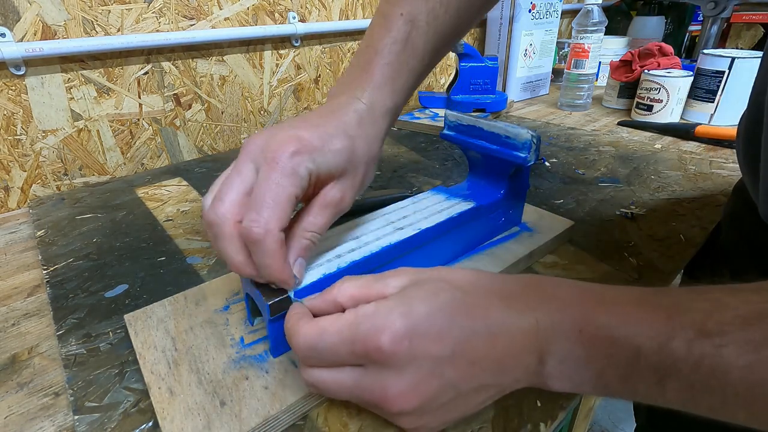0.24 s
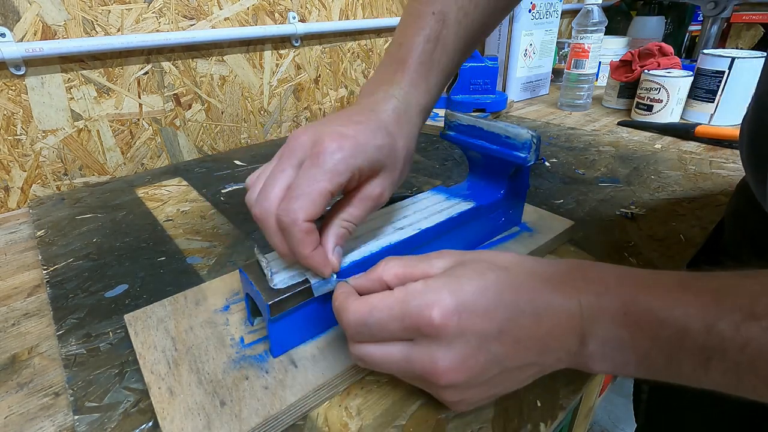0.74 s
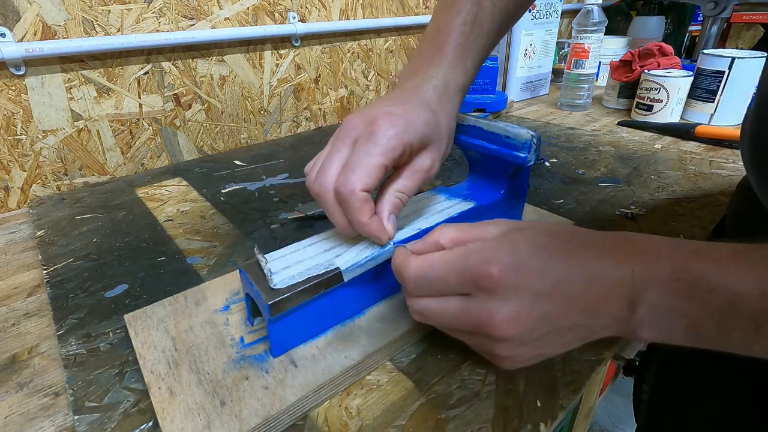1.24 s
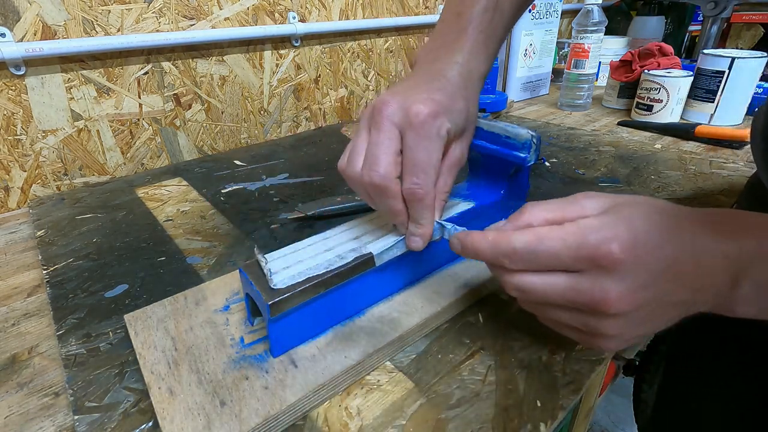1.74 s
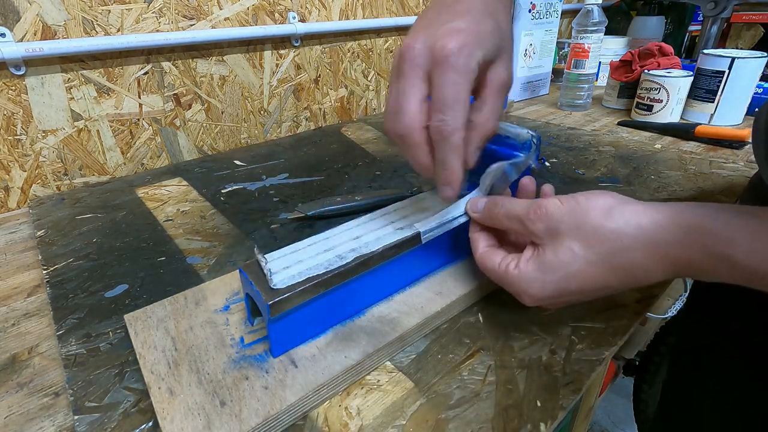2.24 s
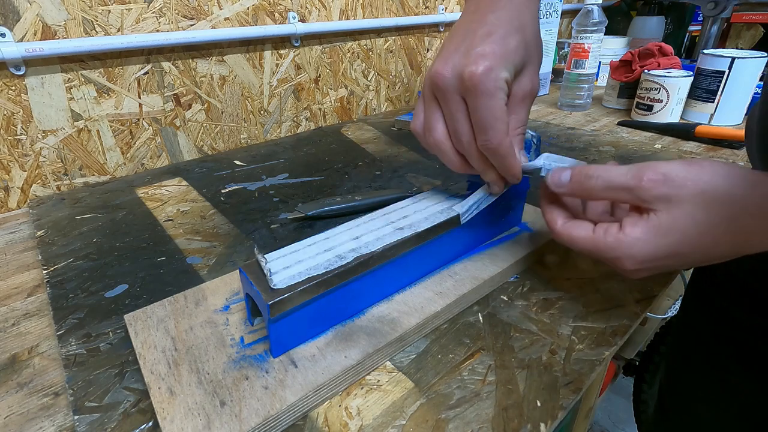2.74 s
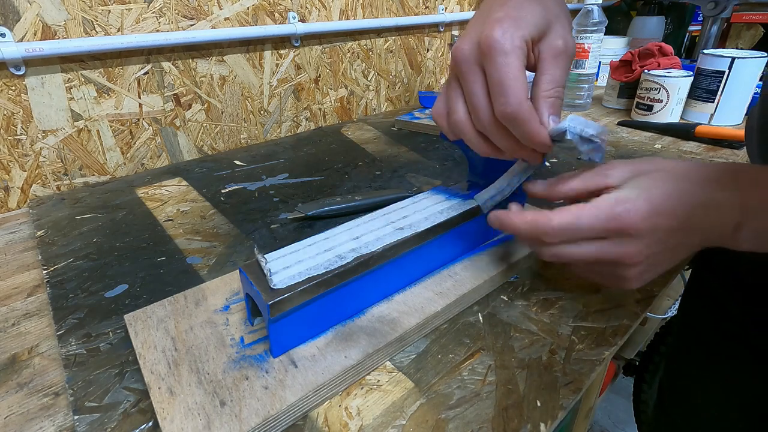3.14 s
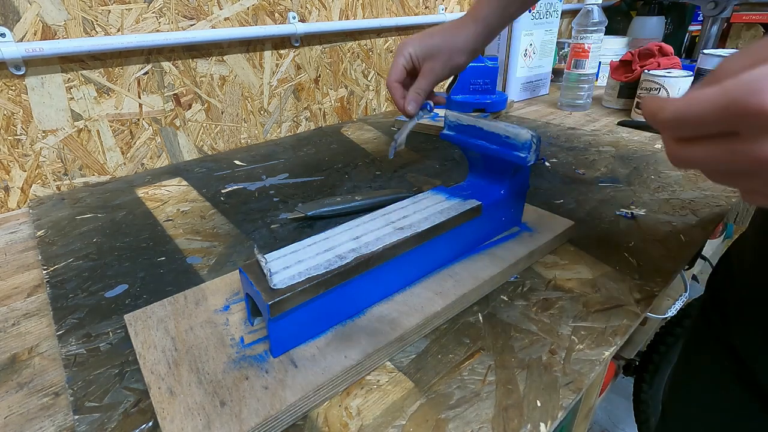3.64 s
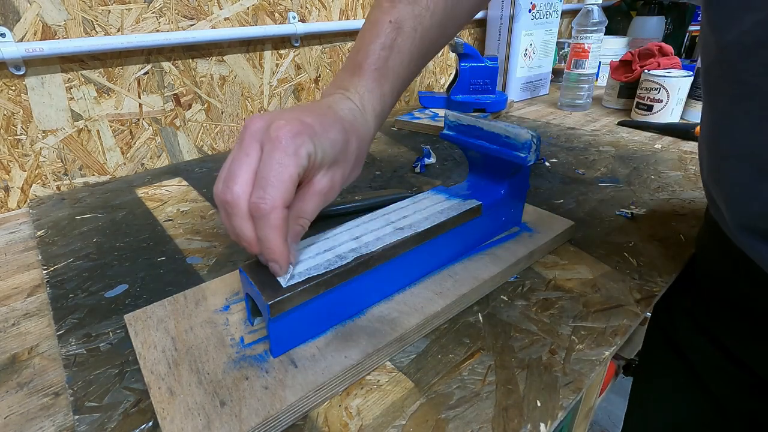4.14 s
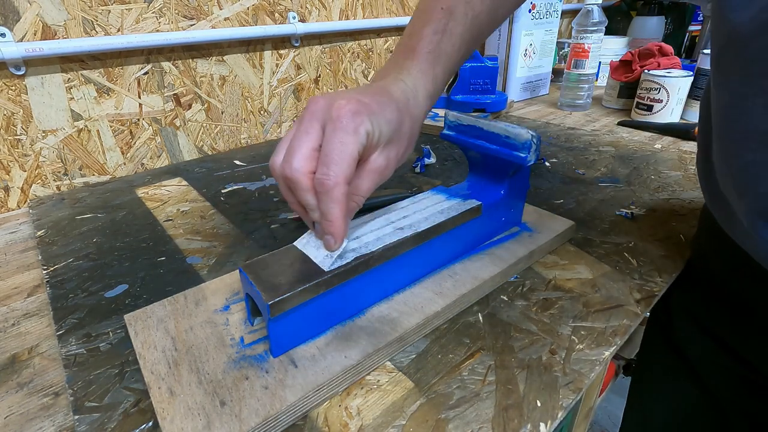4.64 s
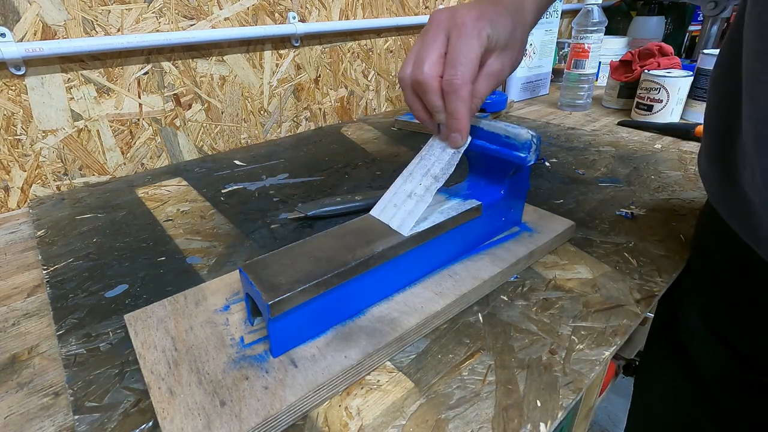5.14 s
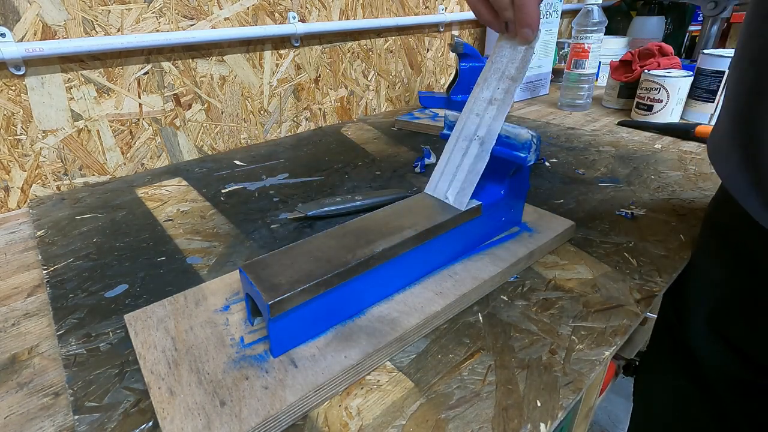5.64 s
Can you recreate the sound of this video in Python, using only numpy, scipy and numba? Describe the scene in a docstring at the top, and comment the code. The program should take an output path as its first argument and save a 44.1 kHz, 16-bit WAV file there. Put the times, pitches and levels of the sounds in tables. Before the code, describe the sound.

A very close, dry stereo scene at a wooden bench in a quiet workshop. From 0 to 0.3 s a dropped knife bounces in a rapid woody rattle with sharp ticks, quickly dying away. Faint tape crackle begins near 0.4 s; from about 1 to 3.3 s narrow masking tape peels in short uneven tugs, bright and papery, with tiny sticky snaps and barely audible low thumps. From 3.4 to 3.75 s the last bits release in a cluster of small clicks and crumpling rustle, thinning out afterwards. At 4.04 s a fingernail makes one light, scratchy tap on the iron. Soft peeling resumes around 4.2 s, with a dull thump at 4.4. The wide strip tears loudest at 5.1 s, then in jerky rips from 5.3 to 5.85 s, with low bench shudders, soft knocks and a breathy, falling tone from the taut strip. Faint room air and a barely audible steady hum continue underneath.

```python
"""A quiet workshop, heard by a close pair of microphones at a wooden bench.
A dropped knife rattles to rest: its blows ring the bench modes. Hands then peel masking tape off a painted
iron part: random slips of glue shape bands of noise into crackle and paper rustle, with sharp single snaps.
The taut strip sings as noise through moving band-passes, the pull shakes the bench, the part thumps softly
and a fingernail taps once. Behind it lies faint banded room air with a steady tone.
"""
import sys
import numpy as np
from scipy import signal
from scipy.io import wavfile
from scipy.ndimage import uniform_filter1d
from numba import njit

SR = 44100
rng = np.random.default_rng(int(sys.argv[2]) if len(sys.argv) > 2 else 0)


def store_wav(level_fs):
    """Save 16-bit WAV to argv[1]."""
    pcm = np.round(np.clip(np.atleast_2d(level_fs), -1, 1) * 32767)
    wavfile.write(sys.argv[1], SR, pcm.T.astype(np.int16))


N = 260190
T = np.arange(N) / SR


def undb(db):
    """Decibels to an amplitude factor."""
    return 10 ** (np.asarray(db) / 20)


def unit(x):
    """Scale to rms 1."""
    return x / np.sqrt(np.mean(x ** 2))


@njit
def moving_bandpass(x, hz, width):
    """State-variable band-pass with a moving centre, gain 1 there."""
    y, b, l = np.empty(len(x)), 0., 0.
    for i in range(len(x)):
        g, k = np.tan(np.pi * hz[i] / SR), width / hz[i]
        v = (b + g * (x[i] - l)) / (1 + g * (g + k))
        b, l, y[i] = 2 * v - b, l + 2 * g * v, k * v
    return y


def band(hz, width):
    """Noise of rms 1 in a steep band."""
    edges = np.clip([hz - width / 2, hz + width / 2], 10, .45 * SR)
    sos = signal.butter(2, edges, "bandpass", fs=SR, output="sos")
    return unit(signal.sosfilt(sos, rng.standard_normal(N)))


def highpass(x, order, hz):
    """Remove what lies below hz."""
    return signal.sosfilt(signal.butter(order, hz, "highpass", fs=SR, output="sos"), x)


def spikes(s, size):
    """An impulse of each size at each time."""
    return np.bincount(np.clip(np.asarray(s) * SR, 0, N - 1).astype(int), size, N)


def fade(x, t60):
    """Each impulse leaves a dying trail."""
    return signal.lfilter([1], [1, -np.exp(-np.log(1000) / (t60 * SR))], x)


def ring(x, hz, t60):
    """One decaying mode, starting amplitude 1 for a unit blow."""
    pole = np.exp(2j * np.pi * hz / SR - np.log(1000) / (t60 * SR))
    return signal.lfilter([1], [1, -pole], x).imag


def pair(envelope, hz, width, apart=0.1):
    """Band noise at two close microphones: alike in the bass, less and less alike above 3 kHz."""
    side = apart + undb(-8.5) / (1 + (3600 / hz) ** 3)
    middle = band(hz, width)
    return envelope * (middle + side * band(hz, width) * np.array([[1], [-1]]))


def wander(points):
    """A random curve of unit spread through evenly spaced points."""
    return np.interp(T, np.linspace(0, T[-1], num=points), rng.standard_normal(size=points))


# tugs of the hand on the tape:
# (start [s], length [s], crackle level at the start [dB], swell over the tug [dB])
TUGS = [(0.356, 0.13, -73.5, 3), (0.636, 0.29, -64.5, 10), (1.008, 0.047, -54.5, -3),
        (1.091, 0.22, -52.5, -6), (1.348, 0.2, -51, -1), (1.683, 0.24, -62, 13.5), (1.976, 0.55, -51.5, -2),
        (2.545, 0.28, -54.5, 1), (2.857, 0.033, -48, 9.5), (2.976, 0.24, -51.5, -26),
        (3.411, 0.083, -61, 6), (3.533, 0.094, -53.5, 0), (3.673, 0.93, -58.5, -11),
        (4.185, 0.22, -62.5, 11.5), (4.589, .17, -52, -1.5), (4.789, 0.24, -57, 14),
        (5.11, .12, -35.5, -8.5), (5.303, 0.066, -54, 8), (5.414, 0.075, -42.5, 4.5), (5.535, .14, -40, 4),
        (5.72, 0.12, -51, 7)]
TAKE_UP_DB_PER_S, LET_GO_DB_PER_S = 575, 477  # rise of the crackle before a tug, fall after it
REST_DB = -75  # crackle while the hand holds still


def hand():
    """Crackle level in dB: each tug takes up, holds while it swells or sags, and lets go."""
    power = undb(2 * REST_DB)
    for start, length, db, swell_db in TUGS:
        held = db + swell_db * np.clip((T - start) / max(length, .001), 0, 1)
        before = np.maximum(start - T, 0)
        after = np.maximum(T - start - length, 0)
        slack = TAKE_UP_DB_PER_S * before + LET_GO_DB_PER_S * after
        power = power + undb(2 * (held - slack))
    return 10 * np.log10(power)


# slow colour of the peeling:
# (time [s], paper rustle offset [dB], centre of the hiss [Hz], weight of hiss power against slips [1])
COLOUR = [(.8, -23.5, 8500, 0.24), (1.12, -32.5, 7900, 0.77), (1.4, -30.5, 4240, 0.63),
          (1.75, -26.5, 8060, 0.55), (2.1, -30, 4560, 0.57), (2.46, -25, 13500, 0.8),
          (3.0, -30.5, 11300, 0.66), (3.399, -27, 5900, 0.19), (3.8, -32.5, 8000, 4.8),
          (4.1, -23.5, 7550, 0.92), (4.6, -32.5, 13900, 0.82), (5.1, -25, 10600, 0.91),
          (5.9, -30, 9700, 0.21)]


def peeling_colour():
    """Slow curves of rustle level, hiss centre and hiss weight as the peeling goes on."""
    s, *columns = np.transpose(COLOUR)
    return [np.interp(T, s, column) for column in columns]


# treble bands of the crackle, also used by the snaps: (centre [Hz], relative level [dB])
CRACKLE = [(3200, -6.5), (4600, 1), (6200, -1), (8200, 3), (10500, -6.5), (13000, 5.5), (15300, 0.5)]


def glue_crackle(hollow_hz, hiss):
    """Treble crackle close at the peel line: glue slips, hollow hiss and a scatter of bare clicks."""
    crackle = slips(220., 3.1, 4.5, hiss, 0.0055, CRACKLE)
    crackle = crackle + undb(-6.5) * hollow(hollow_hz, hiss)
    chance = rng.random((1700, 3)).T
    click_db = 12.5 - 5.2 * np.log(1 - .98 * chance[1])
    pan_db = 14 * (chance[2] - .5)
    return crackle + clicks(chance[0] * N / SR, click_db, pan_db) / (hiss + 1)


def slips(per_s, spread_db, colour_db, hiss, t60, bands):
    """Random releases of glue, most small and a few large, each with its own colour, over a finer hiss."""
    chance = rng.random((int(per_s * N / SR), 2)).T
    size_db = -spread_db * np.log(1 - .995 * chance[1])
    tint = rng.standard_normal((len(bands), len(size_db)))
    out = 0
    for (hz, db), own in zip(bands, tint):
        releases = spikes(chance[0] * N / SR, undb(2 * (size_db + colour_db * own)))
        power = fade(releases, t60 / 2)
        # dividing by the local mean leaves the slow level to the hand
        power = power / (uniform_filter1d(power, 7000) + 1e-9)
        # the bending paper lets each band swell and sink by itself
        db = db + 4.36 * wander(40)
        envelope = np.sqrt((.5 * hiss + power) / (1 + 2 * hiss))
        out = out + undb(db) * pair(envelope, hz, 0.45 * hz)
    return unit(out)


def hollow(hz, hiss):
    """Skin sliding on paper hisses through a resonance between fingers, strip and iron."""
    def resonance():
        once = moving_bandpass(rng.standard_normal(N), hz, 1900.0)
        return unit(moving_bandpass(once, hz, 1900.0))
    mid, side = resonance(), resonance()
    return np.sqrt(hiss / (1 + hiss)) * (mid + .5 * side * np.array([[1], [-1]]))


def clicks(s, db, pan_db):
    """The instant of release: a high-passed impulse, a thin treble spike, each thinner or fuller by chance."""
    sign, thin = rng.choice([-1, 1], len(s)), rng.random(len(s))
    out = 0
    for share, hz in ((1 - thin, 2200), (2.3 * thin, 7000)):
        hits = np.array([spikes(s, share * sign * undb(db + side * pan_db / 2)) for side in (1, -1)])
        out = out + highpass(hits, 2, hz)
    return out


# duller bands of the paper, also used by the snaps: (centre [Hz], relative level [dB])
PAPER = [(hz, 0) for hz in (328, 716, 1148, 1640, 2480)]
PAPER_FOLLOWS = 0.65  # dB of rustle per dB of crackle


def paper_rustle(hiss):
    """Slips heard through the paper, slightly longer and duller, with a soft mid-range hiss."""
    return slips(300., 2.3, 3.1, hiss, 0.0068, PAPER) + 0.33 * hiss * band(1170.0, 600.0)


# the taut strip sings: (time [s], pitch [Hz], level [dB])
STRIP = [(5.38, 1810, -79), (5.45, 1800, -58.5), (5.62, 1650, -46.5), (5.7, 1480, -52)]
# lowest mode of the wide strip sinks as it lengthens: (time [s], pitch [Hz], level against the crackle [dB])
DRONE = [(5.1, 886, -19.5), (5.4, 676, -13), (5.52, 510, -15.5), (5.8, 475, -14)]


def strip_song(crackle_db):
    """Noise through gliding resonances: the stretched strip sings above its own lowest mode."""
    s, hz, db = np.transpose(STRIP)
    song = unit(moving_bandpass(rng.standard_normal(N), np.interp(T, s, hz), 200.0))
    song = song * undb(np.interp(T, s, db, right=-99))
    s, hz, db = np.transpose(DRONE)
    drone = unit(moving_bandpass(rng.standard_normal(N), np.interp(T, s, hz), 83.0))
    drone = drone * undb(crackle_db + np.interp(T, s, db)) * (T > s[0])
    # the strip sounds in patches, as the tension jumps
    return (song + drone) * undb(2.9 * wander(300))


# single snaps of glue and paper: (time [s], relative level [dB], low part against it [dB])
SNAPS = [(0.529, -23.5, -18), (.775, -34, -27), (0.91, -41, -28), (1.0678, -33, -26), (1.102, -34, -25),
         (1.515, -33.5, -15), (1.5693, -21, -26), (1.669, -26, -50), (1.793, -32, -26), (1.88, -30.5, -14),
         (2.1927, -26, -25), (2.243, -33, -34), (2.32, -20, -24), (2.34, -28.5, -23), (2.519, -31.5, -13),
         (2.669, -39, -14.5), (2.804, -31, -25), (2.8624, -26.5, -32), (2.8752, -21, -27),
         (2.9778, -34, -7), (3.1191, -26, -19.5), (3.214, -22.5, -26), (3.2242, -24, -16),
         (3.331, -33, -17), (3.352, -37, -17), (3.416, -35, -32), (3.4519, -22.5, -17), (3.5257, -22, -31),
         (3.5299, -22.5, -20.5), (3.5483, -30, -14), (3.559, -28, -29), (3.6, -33.5, -23),
         (3.6104, -27, -13.5), (3.634, -28, -18.5), (3.678, -33.5, -12.5), (3.705, -31, -15.5),
         (3.752, -35.5, -21), (4.165, -33.5, -13), (4.361, -22, -26), (4.6239, -29.5, -17),
         (4.96, -23.5, -17.5), (5.0897, -25, -16), (5.107, -35, -25), (5.126, -24.5, -19),
         (5.165, -21, -31), (5.187, -29, -24), (5.299, -31, -26), (5.3469, -30, -24), (5.4641, -26, -6),
         (5.6723, -28, -32), (5.7517, -27.5, -19), (5.838, -21, -18.5)]


def glue_snaps():
    """Sudden larger releases of glue and paper, each a crack with a short tail."""
    return snap(*np.transpose(SNAPS), 2.46, -4.5, 0.051)


def snap(s, db, low_db, colour_db, tail_db, tail_s):
    """A crack of a few milliseconds with a short tail from bench top and wall, from a place of its own."""
    pan_db = 2 * rng.standard_normal(len(s))
    out = clicks(s + .0004, db + 6.5, pan_db)
    for bands, level_db, t60 in ((CRACKLE, db - 18.0, .005), (PAPER, db + low_db - 12.0, .012)):
        for hz, band_db in bands:
            own = level_db + band_db + colour_db * rng.standard_normal(len(s))
            lean_db = pan_db * min(hz / 8000, .5)  # bass leans less to one side
            hits = np.array([spikes(s, undb(own + side * lean_db)) for side in (1, -1)])
            # a short smoothing rounds the crack's onset; its tail is duller
            tail = undb(tail_db) / (1 + hz / 6000) * fade(hits, tail_s)
            shape = uniform_filter1d(fade(hits, t60) + tail, size=80)
            out = out + pair(shape, hz, 0.37 * hz)
    return out


# a fingernail meets the iron: (time [s], bands of (centre [Hz], level [dB]), t60 [s])
TAP = (4.0415, [(950, -41), (2600, -33), (5200, -38.5), (8600, -30), (12500, -42)], 0.041)


def nail():
    """A short, scratchy tap in a few broad resonances."""
    s, bands, t60 = TAP
    shape = uniform_filter1d(fade(spikes([s], [1.]), t60), size=90, origin=44)
    return sum(undb(db) * pair(shape, hz, 0.35 * hz) for hz, db in bands)


# the knife lands and bounces: (time [s], relative bench blow [dB], tick against it [dB])
KNIFE = [(0.017, -20, 3), (0.049, -25.5, -31), (0.12, -29.5, 0.5), (.132, -21, 3), (0.163, -21.5, -8),
         (0.175, -24.5, -4.5), (0.202, -24.5, -31), (0.228, -25.5, -34), (0.247, -25, -23),
         (0.268, -29, -37)]
# modes of the bench under the knife: (pitch [Hz], relative level [dB], t60 [s])
BENCH = [(238.4, -5.5, 0.084), (325, -5.5, 0.073), (417, 2.5, 0.053), (448, 2, 0.055), (650, -14, 0.048),
         (852, 1.5, 0.045), (1054, 5, 0.033), (1245, 4.5, 0.022), (1970, 10, 0.013), (2360, 4, 0.028)]


def knife():
    """Knife blows ring the bench modes, each landing with a sharp tick."""
    s, db, tick_db = np.transpose(KNIFE)
    below_db = db - db.max()
    # a weaker bounce is a longer, softer contact and reaches fewer high modes
    reach_hz = 2600 * undb(2.35 * below_db)
    rung = 0
    for hz, mode_db, t60 in BENCH:
        # every landing spot stirs each mode by its own amount
        size = undb(db - 13.0 + 3.6 * rng.standard_normal(len(s))) / (1 + (hz / reach_hz) ** 2)
        blows = spikes(s, size * rng.choice([-1, 1], len(s)))
        # blade and handle chatter for a moment after each landing, then lie still
        moment = uniform_filter1d(blows, size=1000, origin=499, mode="constant")
        blows = blows + 80.0 / (1 + hz / 700) * moment * rng.standard_normal(N)
        rung = rung + undb(mode_db) * ring(blows, hz, t60)
    # remove the lows that ringing leaves below the modes
    rung = highpass(rung, 3, 190)
    low_db = 2.5 + 4.6 * below_db - tick_db
    return rung + snap(s, db + tick_db, low_db, 1.0, -3.5, 0.091)


# resonances of the bench under the pull: (centre [Hz], width [Hz], relative level [dB])
SHAKE = [(139.4, 46, -1.5), (229, 85, -2.5), (402.4, 67, -9.5)]
SHAKE_FOLLOWS = 0.84  # dB of bench shake per dB of crackle
# the wide strip, from this time on, pulls harder on the bench; levels are offsets of the shake
WIDE_STRIP_S, NARROW_SHAKE_DB, WIDE_SHAKE_DB = 4.3, -29, -18.5


def bench_shake(crackle_db):
    """The pull on the tape makes the bench top shudder in a few low resonances."""
    shudder = 0
    for hz, width, mode_db in SHAKE:
        # soft jolts reach each mode at their own moments
        jolts = uniform_filter1d(spikes(rng.random(220) * N / SR, rng.random(220)), size=900)
        shudder = shudder + undb(mode_db) * pair(np.sqrt(0.17 + unit(jolts)), hz, width, 0.0077)
    offset_db = np.where(T < WIDE_STRIP_S, NARROW_SHAKE_DB, WIDE_SHAKE_DB)
    return unit(shudder) * undb(SHAKE_FOLLOWS * crackle_db + offset_db)


# modes of a thump: (ratio to its pitch [1], relative level [dB])
THUMP_MODES = [(1, -1), (0.81, -10), (1.32, -17), (1.67, -14)]
THUMP_S = 0.045  # a thump swells and is damped again within this time


def thump(s, db, hz):
    """The part rocks for a few cycles, swelling and dying softly."""
    turn = np.clip((T - s) / THUMP_S, 0, 1)
    swell = undb(db) * np.sin(np.pi * turn ** 0.35)
    modes = 0
    for ratio, own_db in THUMP_MODES:
        cycles = ratio * hz * (T - s) + rng.random()
        modes = modes + undb(own_db) * np.sin(2 * np.pi * cycles)
    return swell * modes


# soft thumps of the part rocking on the bench: (time [s], level [dB], pitch [Hz])
THUMPS = [(0.533, -56, 245), (1.366, -57.5, 171), (1.578, -53.5, 239), (4.435, -40.5, 243),
          (4.641, -51, 155.5), (4.753, -51.5, 224), (4.885, -48, 193), (4.967, -47.5, 143),
          (5.03, -48, 139), (5.121, -40, 240), (5.417, -41, 145), (5.546, -45, 178), (5.693, -46.5, 130),
          (5.762, -44.5, 483), (5.777, -42, 141)]


def part_thumps():
    """The iron part rocks on the bench, each time at a pitch of its own."""
    return sum(thump(*row) for row in THUMPS)


# spectrum of the workshop air: (frequency [Hz], relative level per Hz [dB])
SHOP = [(25, 22.5), (175, 3.5), (384, 1.5), (936, 17.5), (1230, -22), (2280, -7), (7110, 8), (16000, -68)]
SHOP_DB = -69  # rms of the air
# faint steady tone: (pitch [Hz], level [dB])
HUM = [(398.4, -78.5)]


def shop():
    """The quiet air of the workshop in half-octave bands, with a faint tone."""
    hz, db = np.transpose(SHOP)
    air = 0
    for f in 30 * 2 ** (np.arange(19) / 2):
        level = undb(np.interp(np.log(f), np.log(hz), db)) * np.sqrt(f)  # a wider band holds more power
        air = air + pair(level, f, 0.55 * f, min(f / 1500, .4))
    tone = sum(undb(d) * np.sin(2 * np.pi * f * T) for f, d in HUM)
    return unit(air) * undb(SHOP_DB) + tone


def scene():
    """One pulling hand drives crackle, rustle and bench shake; snaps, knife and tap fall on top."""
    crackle_db = hand()
    paper_db, hollow_hz, hiss = peeling_colour()
    crackle = glue_crackle(hollow_hz, hiss) * undb(crackle_db)
    rustle = paper_rustle(hiss) * undb(PAPER_FOLLOWS * crackle_db + paper_db)
    tape = crackle + rustle + strip_song(crackle_db)
    bench = knife() + bench_shake(crackle_db) + part_thumps()
    return tape + glue_snaps() + nail() + bench + shop()


def record(dry):
    """Steep low-pass: nothing is left above 15.9 kHz."""
    return signal.sosfilt(signal.ellip(10, .2, 70, 15900, fs=SR, output="sos"), dry)


dry = scene()
out = record(dry)
store_wav(out)
```